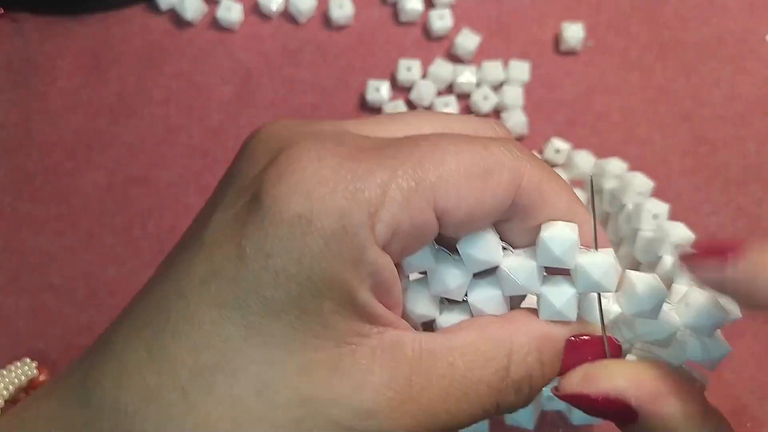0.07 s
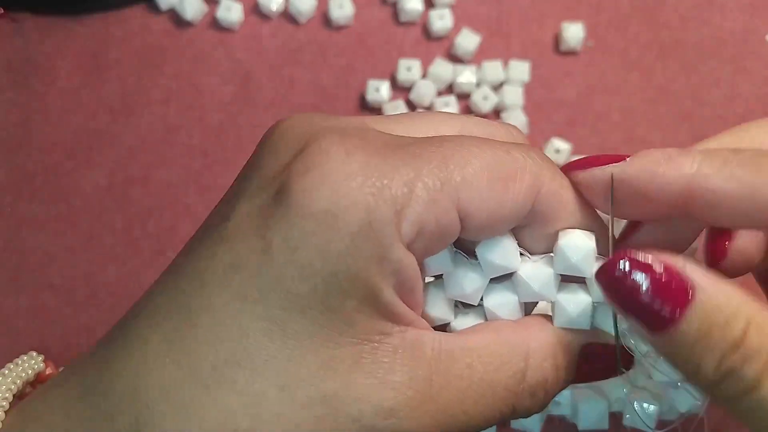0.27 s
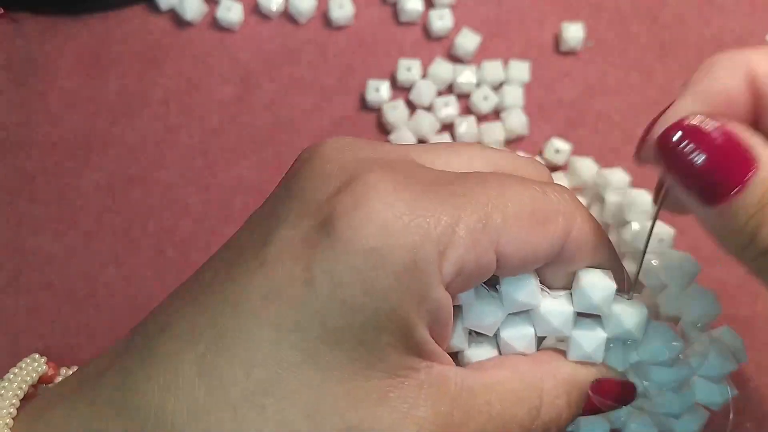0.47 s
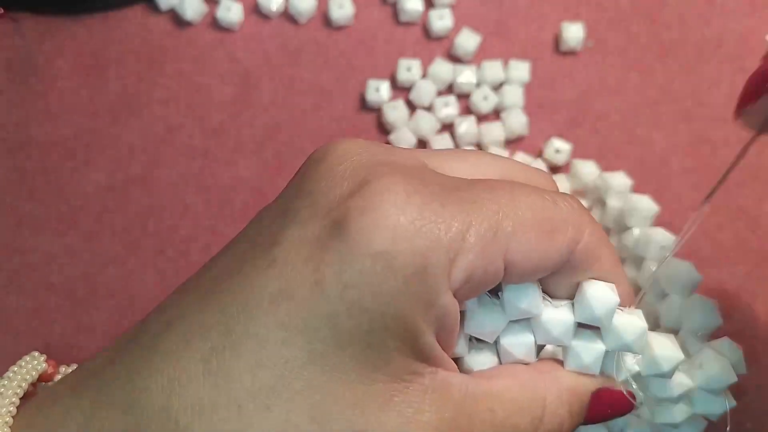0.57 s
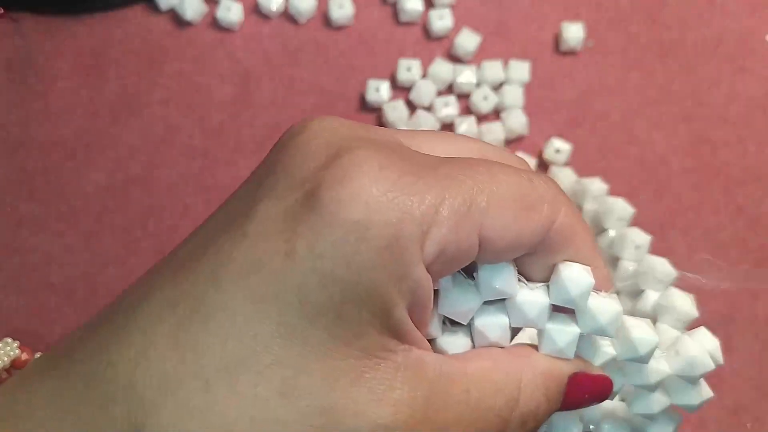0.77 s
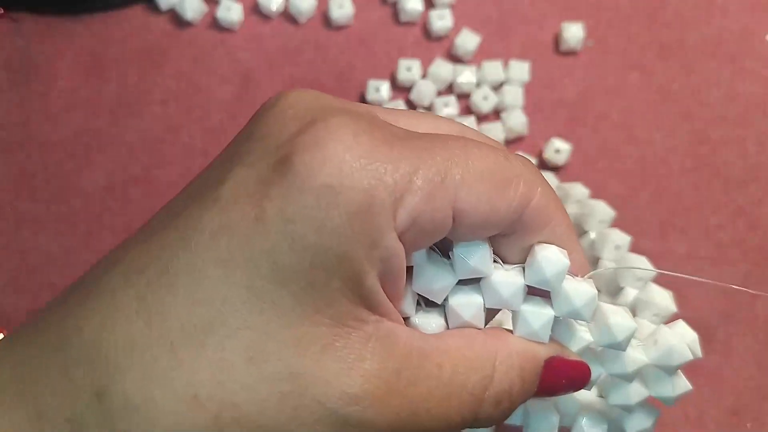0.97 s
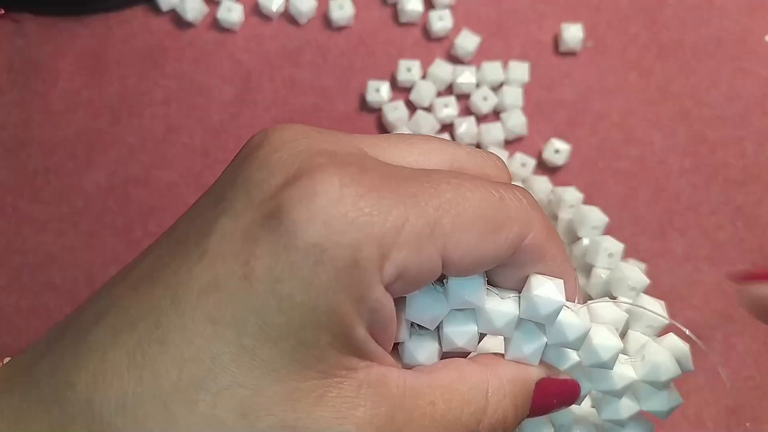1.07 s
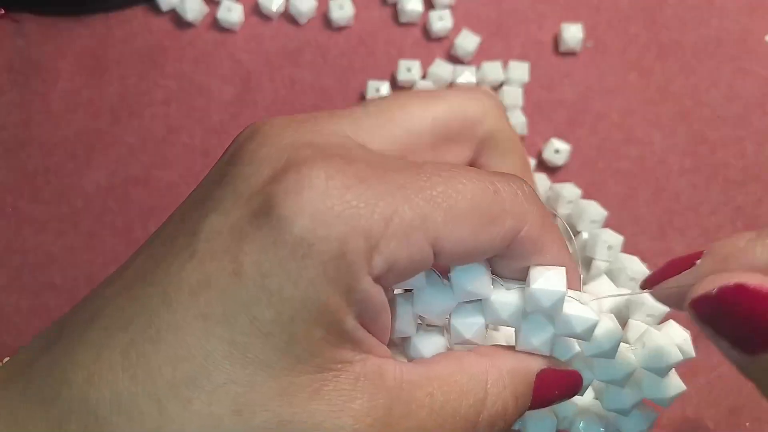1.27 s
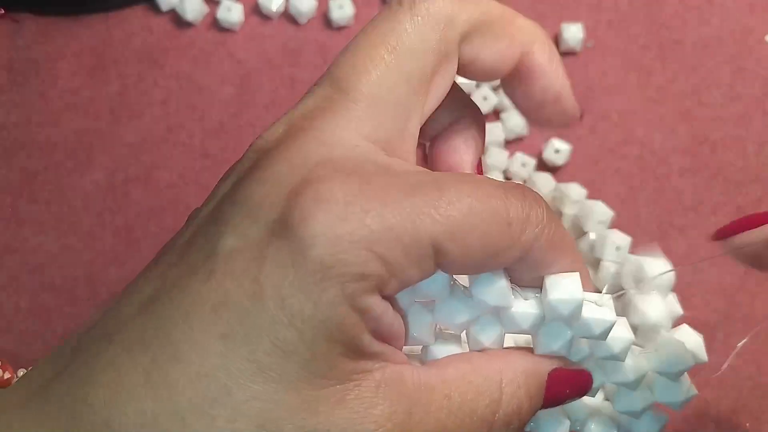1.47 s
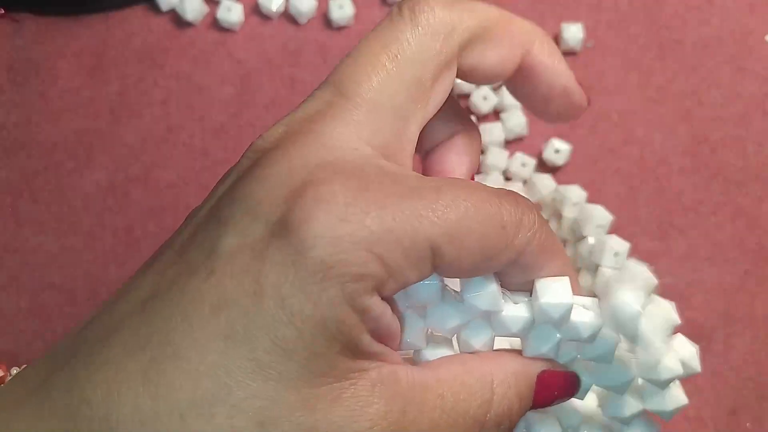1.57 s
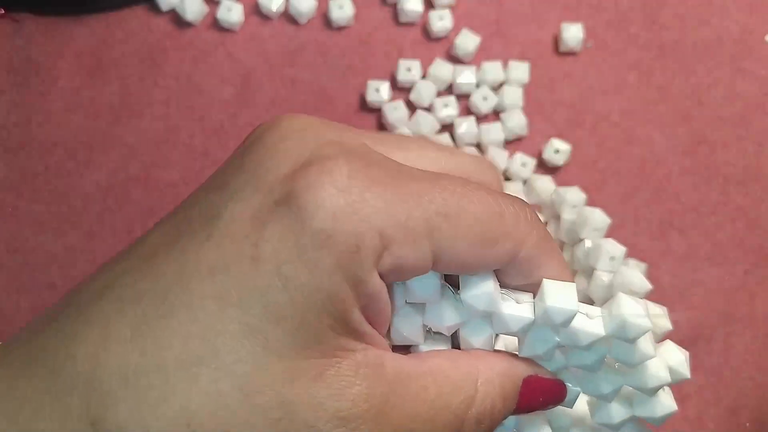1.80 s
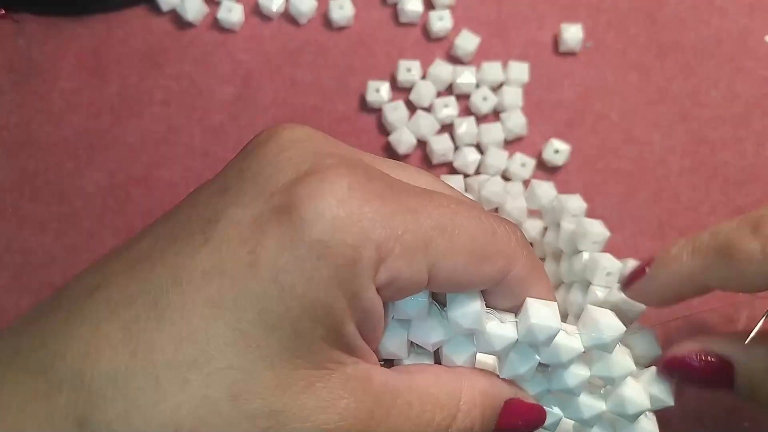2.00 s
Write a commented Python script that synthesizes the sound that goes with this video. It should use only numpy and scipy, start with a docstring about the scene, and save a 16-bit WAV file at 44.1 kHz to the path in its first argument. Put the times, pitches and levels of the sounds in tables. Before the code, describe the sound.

Close stereo pickup of beads being woven by hand indoors: soft thread rubbing and tiny crisp clicks first, then sharper knocks bunching into a short rattle, fading to sparse ticks over low rumble and faint hiss.

```python
"""Plastic beads woven by hand

Faceted beads click close to the microphones in a small quiet room: the thread slides and nudges
single beads, then a finger regrips the piece and they clatter. Each click is a chatter of contacts
exciting a bright bead resonance and the duller modes of the woven piece. Rubbing is shaped noise,
hand shifts are low filtered noise; echoes are decaying noise over a room tone of rumble and hiss."""
import sys
import numpy as np
from scipy import signal
from scipy.fft import rfft, irfft
from scipy.io import wavfile

SR = 44100
rng = np.random.default_rng(int(sys.argv[2]) if len(sys.argv) > 2 else 0)


def master(y):
    """Save y as 16-bit WAV."""
    cut = np.clip(np.atleast_2d(y).T, -1, 1)
    pcm = np.round(cut * 32767)  # scale
    wavfile.write(sys.argv[1], SR, pcm.astype(np.int16))


N = 89919


def from_db(db):
    """Logarithmic level: decibels to amplitude gain."""
    return 10 ** (np.asarray(db) / 20)


def unit(x):
    """Energy normalization: scale each channel to energy 1."""
    return x / np.sqrt(np.sum(x ** 2, axis=-1, keepdims=True) + 1e-20)


def panned(db):
    """Constant-power panning: gains for a left-minus-right level difference."""
    gains = from_db(np.array([[db / 2], [-db / 2]]))
    return gains / np.sqrt(np.mean(gains ** 2))


def coloured(x, points):
    """Spectral shaping: weight the spectrum of noise, then set its rms to 1."""
    hz, db = np.transpose(points)
    size = x.shape[-1]
    f = np.maximum(np.fft.rfftfreq(size, 1 / SR), 1)
    gain = from_db(np.interp(np.log(f), np.log(hz), db))
    return unit(irfft(rfft(x) * gain, size)) * np.sqrt(size)


def resonance(x, hz, width_hz):
    """Simple resonator: a pole pair rings at one frequency, with gain 1 on top."""
    r = np.exp(-np.pi * width_hz / SR)
    zeros = np.array([1, 0, -1]) * (1 - r * r) / 2
    poles = [1, -(1 + r * r) * np.cos(2 * np.pi * hz / SR), r * r]
    return signal.lfilter(zeros, poles, x + 1e-18)


def grains(grain_db, size):
    """Random impact excitation: dense contacts of uneven strength at two microphones."""
    return rng.standard_normal((2, size)) * from_db(grain_db * rng.standard_normal(size))


PING_WIDTH_HZ, PING_LOW_HZ = 4640, 4400  # resonance width, low cut
CHATTER_GRAIN_DB = 0.5  # unevenness of the contacts in a click
CHATTER_RISE = 0.2  # contacts build up over this share of their decay time
HARD_CLICK_DB, DULLING_HZ = -13, 1370  # clicks below this level lose up to this much of their top
# highest top cutoff of the pings, duller on the right: (left [Hz], right [Hz])
PING_TOPS = (13700, 11560)
# bead clicks, ping level over one millisecond: (time [s], level [dB], ping frequency [Hz],
# knock relative to ping [dB], knock frequency [Hz], left-right difference of ping [dB], chatter decay [s])
BEAD_CLICKS = [(.324, -55.5, 10500, -26, 3000, 4, 0.0022), (.533, -61, 8500, -3, 2200, 3, .001),
               (0.545, -56.5, 10400, -3, 2600, 7, 0.00098), (0.5715, -53, 8800, -1.5, 990, 1, 0.0015),
               (.6145, -51.5, 9700, -22, 3000, 4, 0.00049), (0.6756, -47.5, 10600, -12, 5460, 5, 0.0016),
               (0.7911, -46, 10400, -21, 2600, 3, .001), (0.8197, -37.5, 11200, -29, 2600, 27, 0.00018),
               (0.845, -49, 10200, -25, 2600, 4, .00037), (0.8646, -41.5, 10000, -14.5, 2580, 19, 0.0005),
               (0.882, -32, 10300, -15.5, 970, 6, 0.00052), (0.8937, -46, 10000, -8, 5500, -13, 0.00075),
               (0.897, -31, 10500, -12.5, 2700, 9, 0.00024), (0.9, -38, 9950, -5, 2720, 1, 0.0011),
               (.9028, -36.5, 10200, -10, 2400, 7, .001), (0.913, -51.5, 10100, -6, 2760, 11, 0.00048),
               (.918, -54, 9000, 3, 2790, 2, .011), (1.3767, -44, 10000, -20, 2000, -19, 0.00037),
               (1.3792, -30.5, 10200, -10.5, 4040, 2.5, 0.00036),
               (1.4132, -43.5, 8700, -9.5, 3340, 1, 0.00023), (1.506, -55, 8700, -5, 3000, 0, 0.0015),
               (1.5572, -44.5, 8800, -5.5, 5750, 0, 0.0024), (1.5605, -40.5, 9000, -11.5, 1010, 4, 0.00089),
               (1.608, -31, 9400, -12.5, 6100, 39, 0.0015), (1.611, -30.5, 9800, -17.5, 1010, -3, 0.00052),
               (1.6361, -35.5, 8950, -20, 5500, 2, 0.00033), (1.639, -41, 9300, -14, 2200, 3, .00084),
               (1.644, -35, 9000, -23, 5500, 14, 0.0046), (1.6591, -34, 9400, -21, 1500, 2, 0.00091),
               (1.664, -28, 9200, -20, 1500, -18, 0.00068), (1.667, -20.5, 10400, -22, 1300, 23, 0.0014),
               (1.675, -22, 9800, -13, 5300, 2.5, 0.0016), (1.6777, -24.5, 9500, -26, 1220, 19, 0.0013),
               (1.712, -16.5, 9000, -18, 4280, -5.5, 0.00028),
               (1.7161, -15.5, 9600, -23, 5440, -2.5, 0.00091),
               (1.7171, -15, 10400, -15.5, 3270, 46, 0.0011), (1.719, -33.5, 9400, -11, 1210, -8, 0.0044),
               (1.7227, -25, 8400, -13, 3420, -18, 0.0017), (1.7258, -21.5, 9200, -21.5, 3360, 21, 0.0019),
               (1.738, -42, 9300, -5.5, 3080, 13, 0.0011), (1.752, -40, 9900, -24, 5400, -1, .0007),
               (1.7635, -46, 9600, -13, 5400, 4, .0005), (1.8732, -38.5, 8300, -13.5, 3530, 4, 0.00042),
               (1.9806, -42, 9050, -12, 2350, 7, 0.0025), (2.012, -55, 10100, -10, 2580, 12, .0015)]


def bead_clicks():
    """Impact excitation: a brief chatter of contacts rings the bead and knocks the woven piece."""
    size = SR // 10
    out, t = np.zeros((2, N + size)), np.arange(size) / SR
    millisecond = SR / 1000  # in samples
    low_cut = signal.butter(2, PING_LOW_HZ, "high", fs=SR, output="sos")
    for s, db, hz, knock_db, knock_hz, pan_db, chatter_s in BEAD_CLICKS:
        build_up = 1 - np.exp(-t / (CHATTER_RISE * chatter_s))
        contacts = grains(CHATTER_GRAIN_DB, size) * np.exp(-t / chatter_s) * build_up
        ping = signal.sosfilt(low_cut, resonance(contacts, hz, PING_WIDTH_HZ))

        # softer contacts are duller
        softness = max(1 - from_db(db - HARD_CLICK_DB), 0)
        tops = np.minimum(np.array(PING_TOPS) - DULLING_HZ * softness, SR / 2 - 1)
        sides = [signal.sosfilt(signal.butter(4, top, fs=SR, output="sos"), side)
                 for top, side in zip(tops, ping)]
        ping = unit(np.array(sides)) * panned(pan_db)

        body = from_db(knock_db) * knock(contacts.sum(axis=0), knock_hz)
        i = int(s * SR)
        out[:, i:i + size] += from_db(db) * np.sqrt(millisecond) * (ping + body)
    return out[:, :N]


GRIP_DETUNE, GRIP_SPREAD_DB = 0.066, -5.5  # random spread of mode pitch [log ratio] and level
PIECE_DB = -1  # the whole piece against the struck spot
SPOT_Q = 3.5  # sharpness of the struck spot's resonance
KNOCK_LOW_HZ, KNOCK_LAG_S = 810, .00007  # low cut, lag of the right side
# modes of the woven piece, before the spread: (frequency [Hz], relative level [dB], 60 dB decay [s])
PIECE_MODES = [(1070, -29, 0.015), (1520, -16, 0.0046), (2140, -14, 0.0023), (2670, 8, 0.008),
               (3320, 5, 0.008), (4340, 6.5, 0.024), (5190, 9.5, 0.011)]


def knock(push, spot_hz):
    """Modal synthesis: the struck spot rings with the damped modes, later on the right side."""
    modes = 0
    for hz, db, t60 in PIECE_MODES:
        # every bead is held a little differently
        gain = from_db(db + GRIP_SPREAD_DB * rng.standard_normal())
        mode_hz = hz * np.exp(GRIP_DETUNE * rng.standard_normal())
        width_hz = np.log(1000) / (np.pi * t60)
        modes = modes + gain * unit(resonance(push, mode_hz, width_hz))
    spot = unit(resonance(push, spot_hz, spot_hz / SPOT_Q))
    rings = spot + from_db(PIECE_DB) * unit(modes)
    low_cut = signal.butter(2, KNOCK_LOW_HZ, "high", fs=SR, output="sos")
    rings = unit(signal.sosfilt(low_cut, rings))
    t = np.arange(len(push)) / SR
    return np.array([rings, np.interp(t - KNOCK_LAG_S, t, rings, left=0)])


RUB_GRAIN_DB = 8.5  # unevenness of the friction grains
# rubs of thread and beads: (time of peak [s], rise [s], fall [s], level [dB], left-right difference [dB])
THREAD_RUBS = [(.31, 0.014, 0.042, -73, 7), (.57, 0.054, 0.083, -69.5, -4), (.728, 0.032, 0.017, -59, 3.5),
               (.85, 0.045, 0.11, -62.5, -5), (.89, 0.016, 0.03, -57.5, 14), (1.0, 0.17, 0.2, -71.5, 5),
               (1.53, 0.14, 0.063, -75, 0), (1.639, 0.026, 0.022, -52.5, -12),
               (1.722, 0.0097, 0.012, -36.5, -5.5), (2.02, 0.037, 0.016, -62, 2)]
# spectrum of the rubbing: (frequency [Hz], relative level [dB])
RUB_SPECTRUM = [(500, -8), (2000, -7.5), (5000, -6), (8000, 1.5), (10500, 4), (13000, -7), (16000, -12)]


def thread_rubs():
    """Stick-slip friction: fine uneven noise swells and fades with each pull."""
    t = np.arange(N) / SR
    level = 0
    for s, rise, fall, db, pan_db in THREAD_RUBS:
        swell = np.exp(-((t - s) / np.where(t < s, rise, fall)) ** 2)
        level = level + from_db(db) * panned(pan_db) * swell
    return level * coloured(grains(RUB_GRAIN_DB, N), RUB_SPECTRUM)


SHIFT_S, SHIFT_HZ, SHIFT_WIDTH_HZ = 0.03, 222, 220  # swell time, centre, width of each filter pass
# hand shifts on the piece: (time [s], level [dB])
HAND_SHIFTS = [(.68, -64.5), (.88, -64), (.98, -69)]


def hand_shifts():
    """Band-limited noise: soft low surges as the hands move, filtered by two equal resonances."""
    t = np.arange(N) / SR
    level = sum(from_db(db) * np.exp(-((t - s) / SHIFT_S) ** 2) for s, db in HAND_SHIFTS)
    noise = rng.standard_normal((2, N)) + rng.standard_normal(N)  # partly shared by both sides
    for _ in range(2):
        noise = resonance(noise, SHIFT_HZ, SHIFT_WIDTH_HZ)
    return level * np.sqrt(N) * unit(noise)


ECHO_GRAIN_DB = 9  # unevenness of the single echoes


def reflections(x, colour, level_db, t60, delay_s):
    """Diffuse reflection: delayed, exponentially decaying echoes, different on each side."""
    t = np.arange(SR // 2) / SR
    echoes = coloured(grains(ECHO_GRAIN_DB, len(t)), colour)
    tail = echoes * from_db(-60 * t / t60) * (t > delay_s)
    return from_db(level_db) * signal.fftconvolve(x, unit(tail), axes=1)[:, :N]


# spectrum of the echoes from hands and table: (frequency [Hz], relative level [dB])
NEAR_SPECTRUM = [(500, 0.5), (1500, 2), (3000, 6), (6000, -1), (10000, 1.5), (15000, -1.5)]


def near_reflections(x):
    """Early reflection: hands and table scatter the sound almost at once."""
    return reflections(x, NEAR_SPECTRUM, level_db=-8, t60=0.065, delay_s=0.00075)


# spectrum of the room's echoes: (frequency [Hz], relative level [dB])
ROOM_SPECTRUM = [(500, 10.5), (1500, -2.5), (3000, -1.5), (6000, -0.5), (10000, 0.5), (13000, -5.5),
                 (16000, 3)]


def room_reflections(x):
    """Reverberation: the small room answers later and dies away more slowly."""
    return reflections(x, ROOM_SPECTRUM, level_db=-16.5, t60=0.29, delay_s=0.0073)


FLOOR_DB, FLOOR_PAN_DB = -54, -2  # level, left-right difference
FLOOR_LIKENESS = 0.17  # shared noise against each side's own
# spectrum of room tone and hiss: (frequency [Hz], relative density [dB per Hz])
FLOOR_SPECTRUM = [(8.8, -25), (15, 7.5), (33, -14), (65, -12), (86, -21.5), (175, -19.5), (262, -23),
                  (469, -28), (543, -29.5), (592, -29), (917, -35.5), (6290, -45), (10600, -41.5),
                  (16000, -63.5)]


def room_tone():
    """Stationary noise: low rumble and faint hiss, mostly uncorrelated left and right."""
    noise = rng.standard_normal((2, N)) + FLOOR_LIKENESS * rng.standard_normal(N)
    return from_db(FLOOR_DB) * panned(FLOOR_PAN_DB) * coloured(noise, FLOOR_SPECTRUM)


def scene():
    """Superposition: beads and thread with their echoes, then hand shifts and room tone."""
    work = bead_clicks() + thread_rubs()
    work = work + near_reflections(work)
    return work + room_reflections(work) + hand_shifts() + room_tone()


def record(dry):
    """Low-pass filtering: an elliptic filter cuts the top steeply."""
    top_cut = signal.ellip(10, .2, 80, 16200, fs=SR, output="sos")  # order, ripple dB, stop dB, Hz
    return signal.sosfilt(top_cut, dry)


dry = scene()
out = record(dry)
master(out)
```